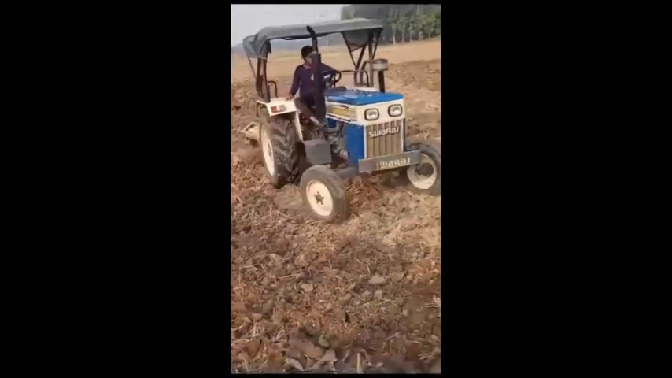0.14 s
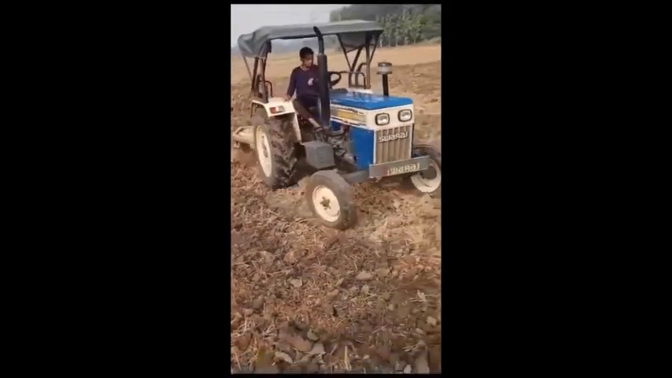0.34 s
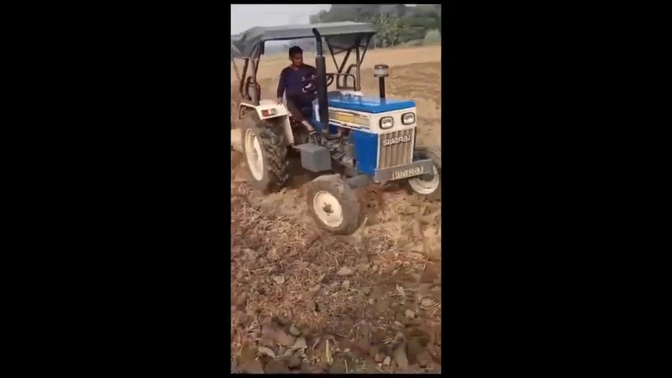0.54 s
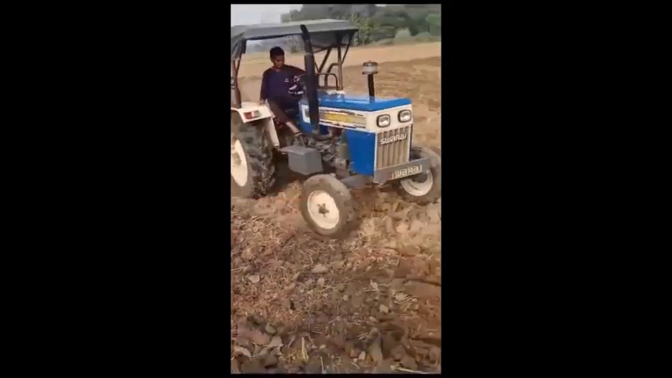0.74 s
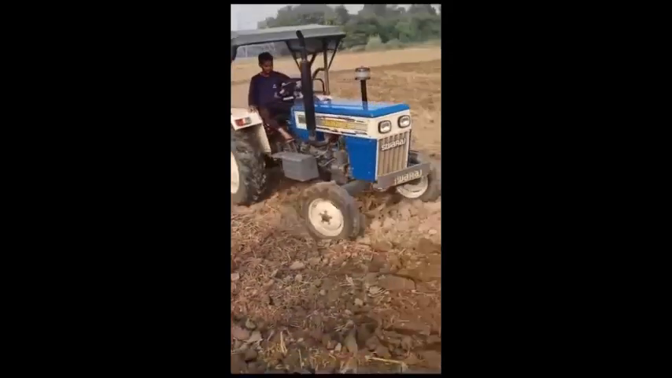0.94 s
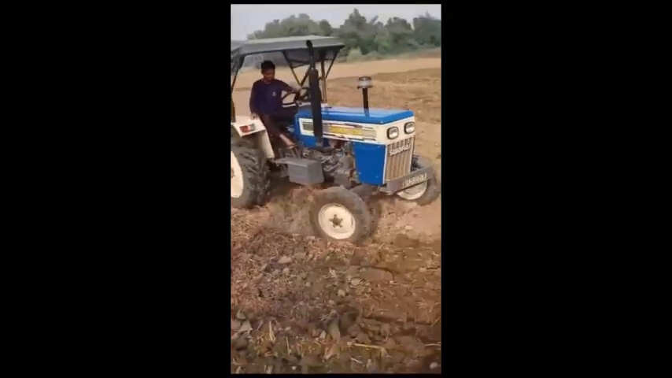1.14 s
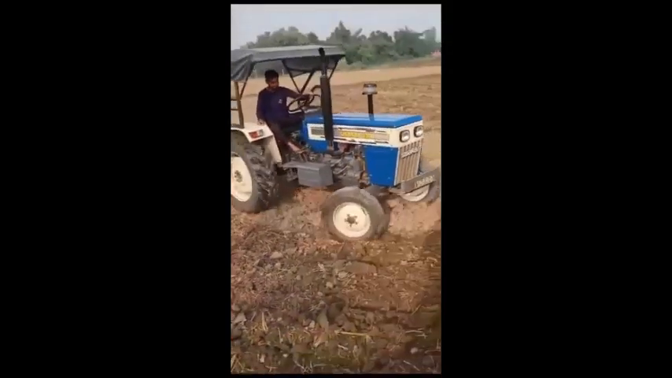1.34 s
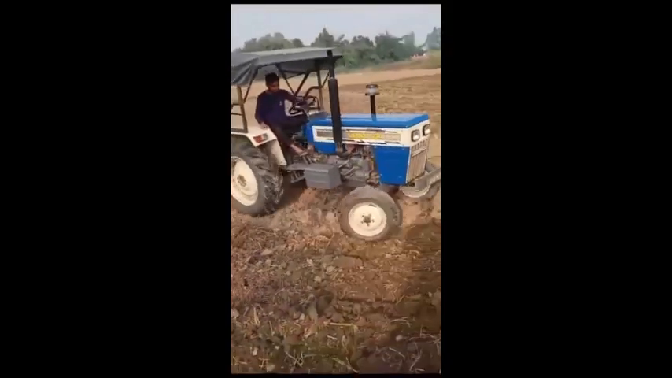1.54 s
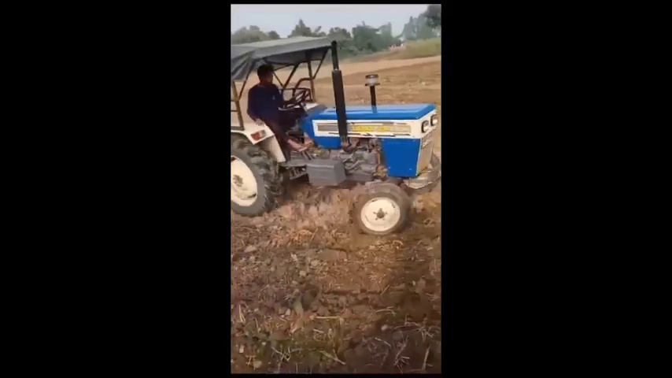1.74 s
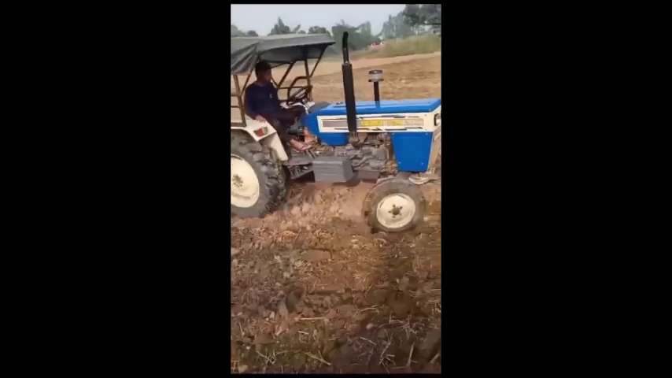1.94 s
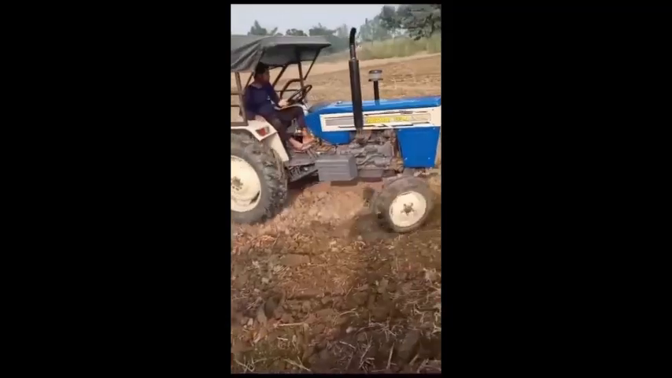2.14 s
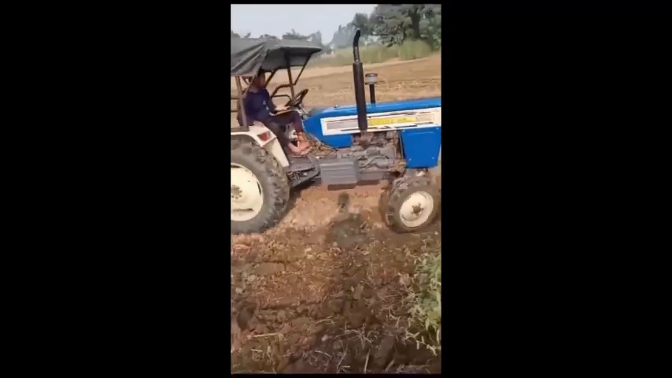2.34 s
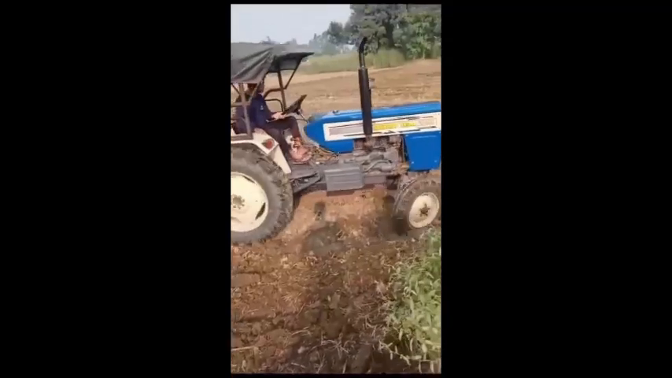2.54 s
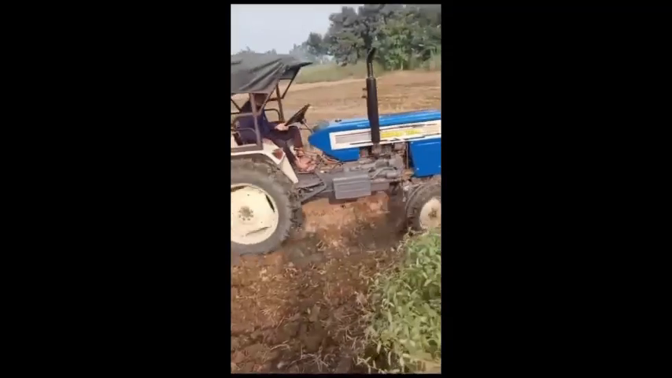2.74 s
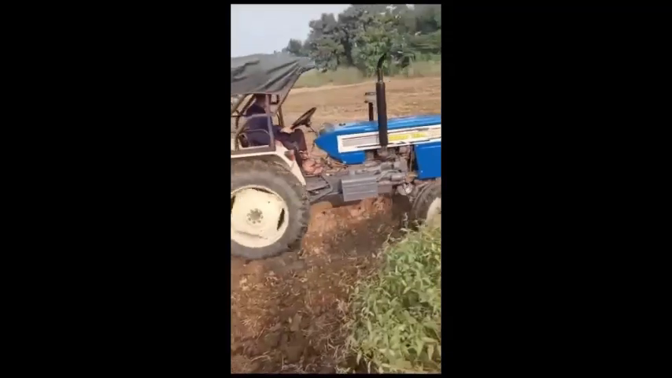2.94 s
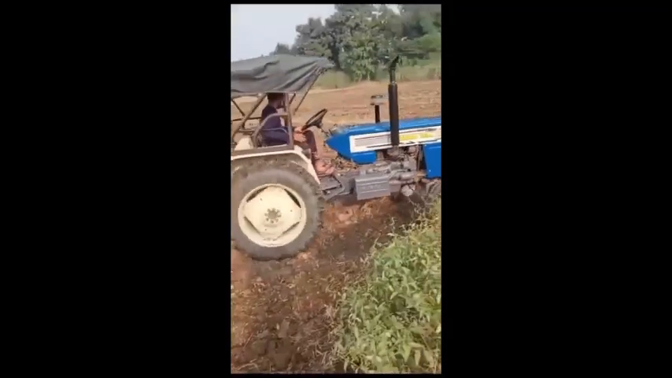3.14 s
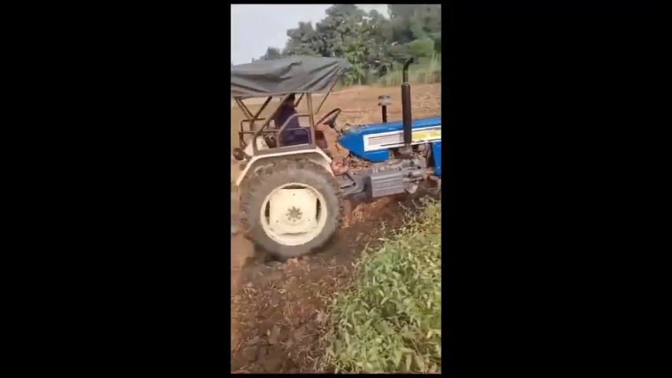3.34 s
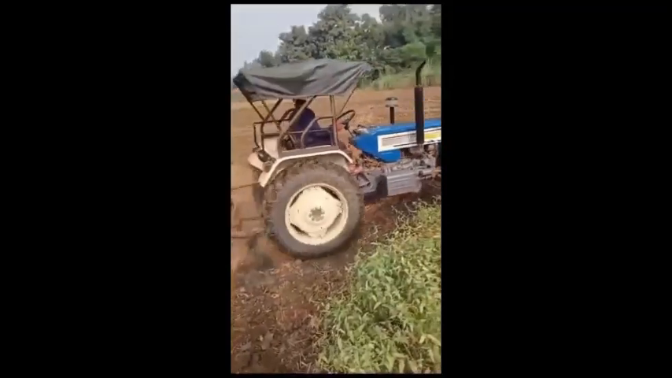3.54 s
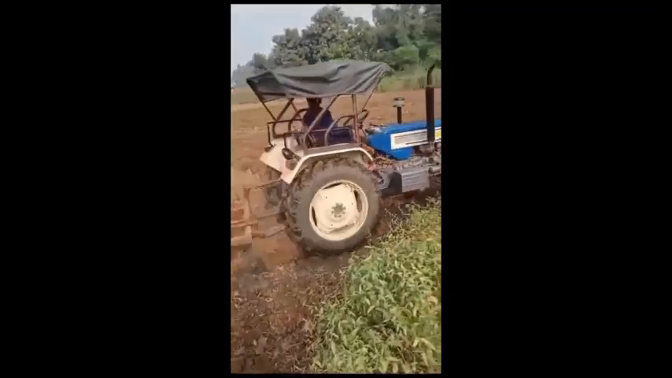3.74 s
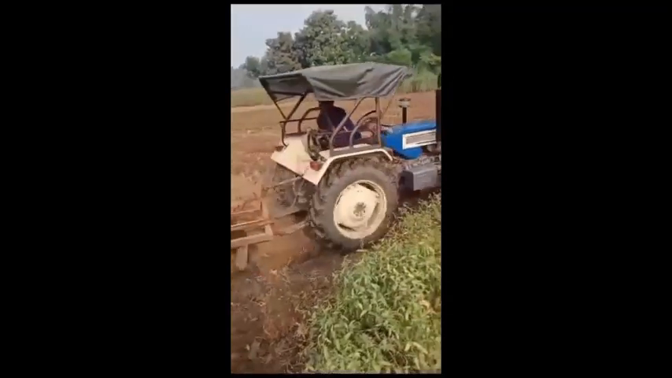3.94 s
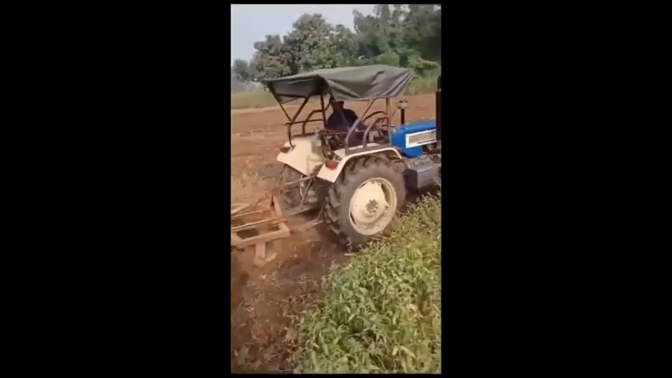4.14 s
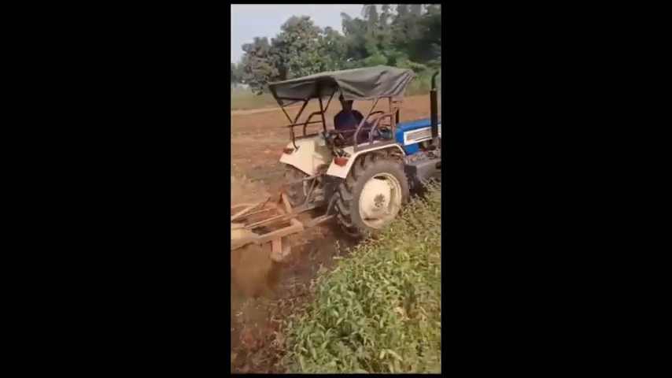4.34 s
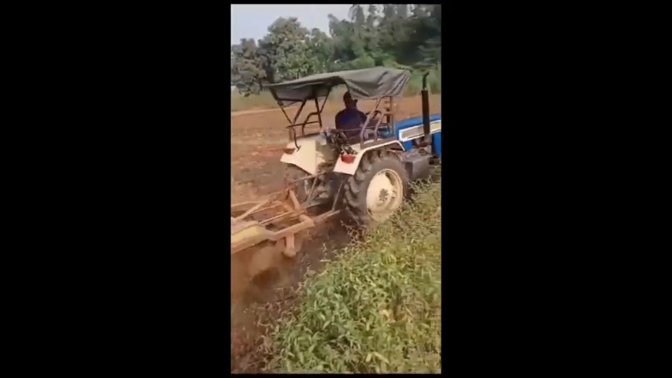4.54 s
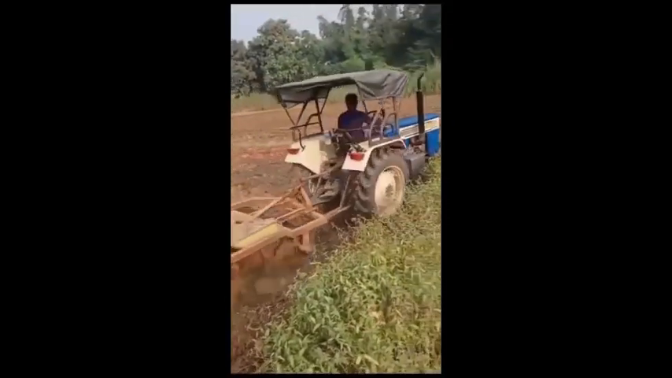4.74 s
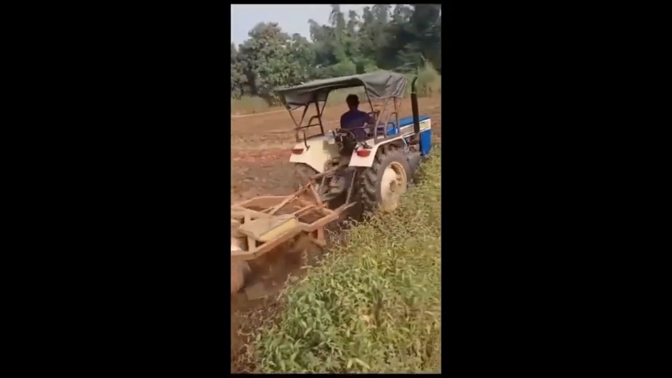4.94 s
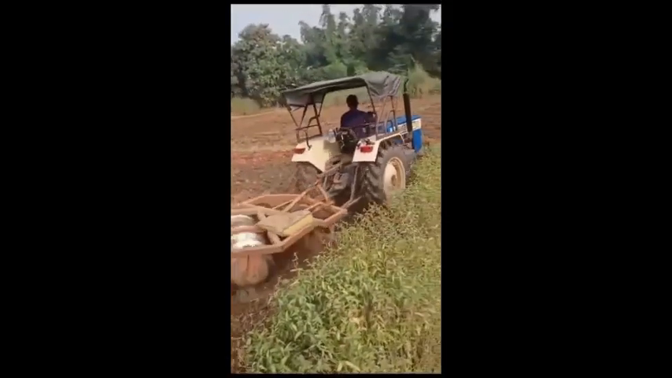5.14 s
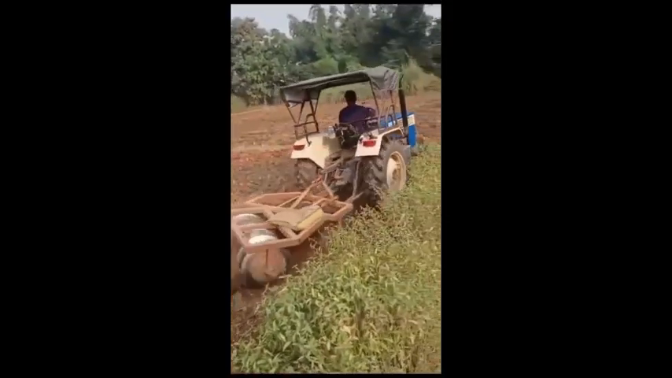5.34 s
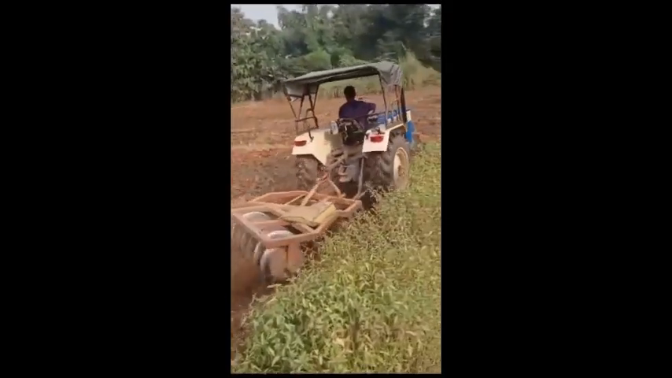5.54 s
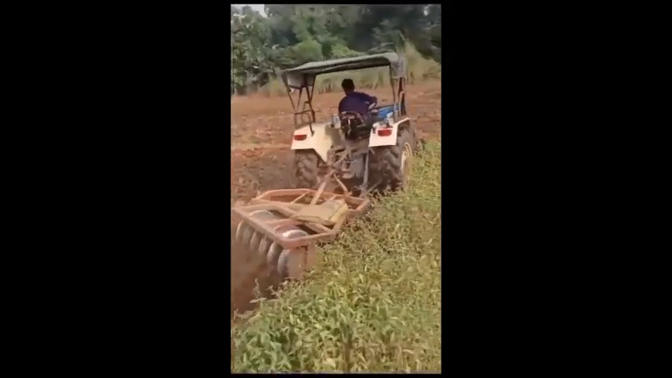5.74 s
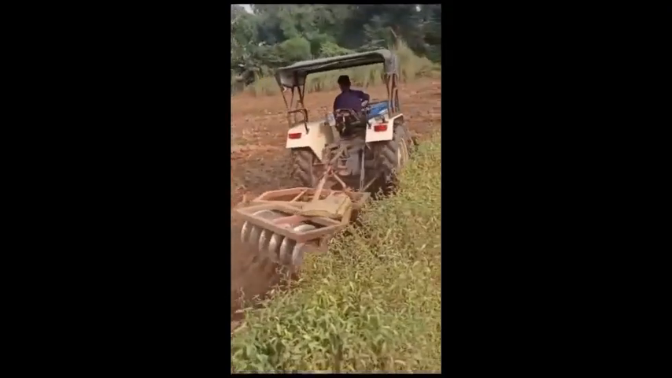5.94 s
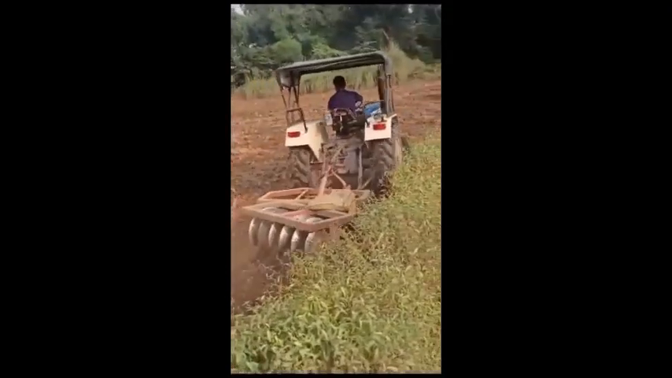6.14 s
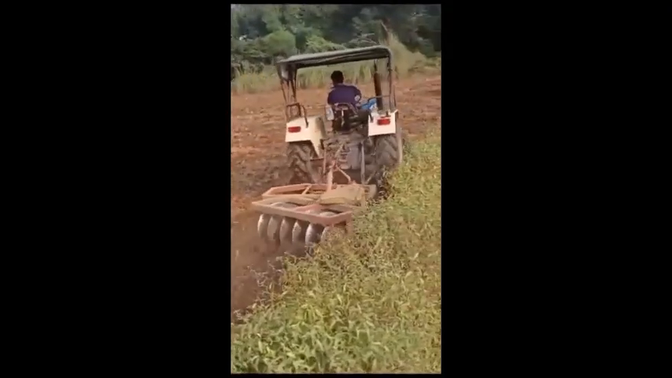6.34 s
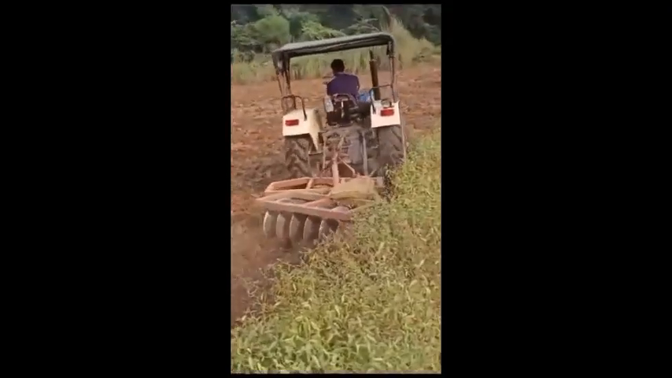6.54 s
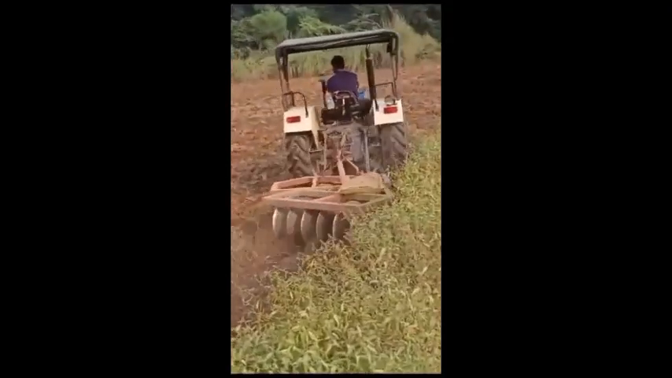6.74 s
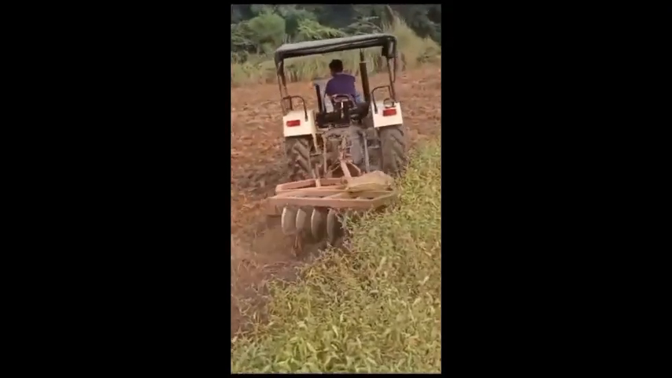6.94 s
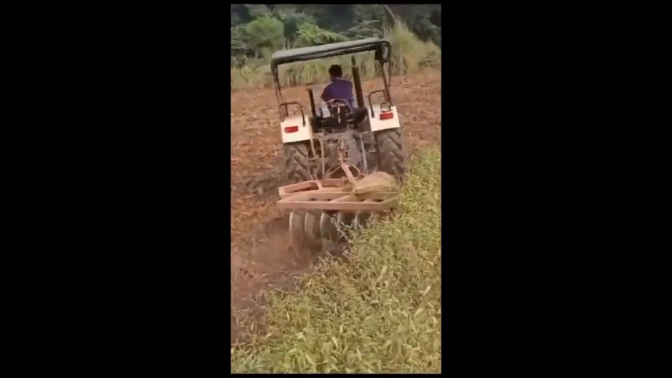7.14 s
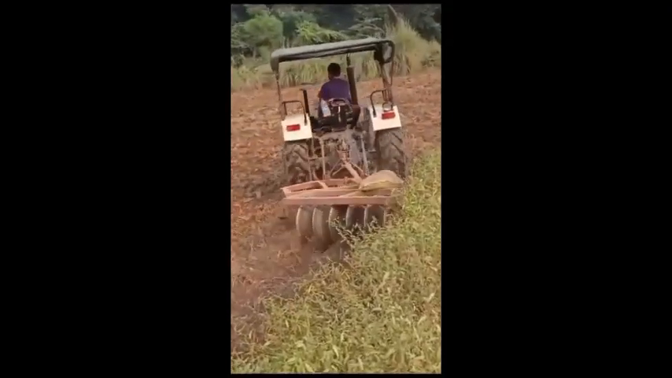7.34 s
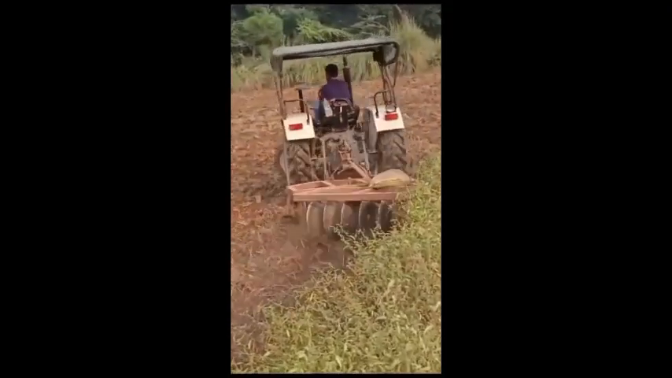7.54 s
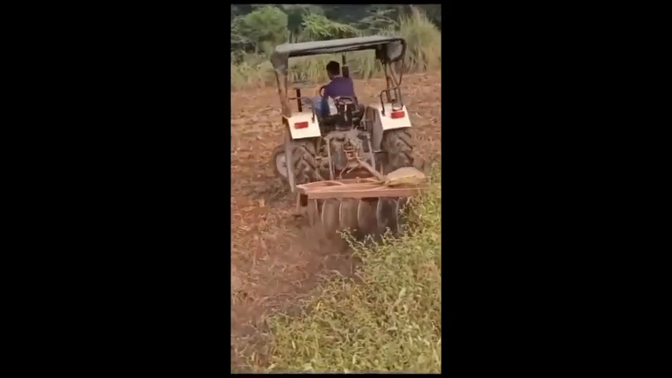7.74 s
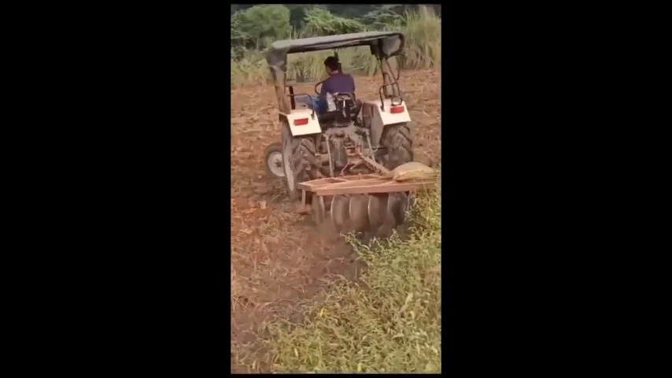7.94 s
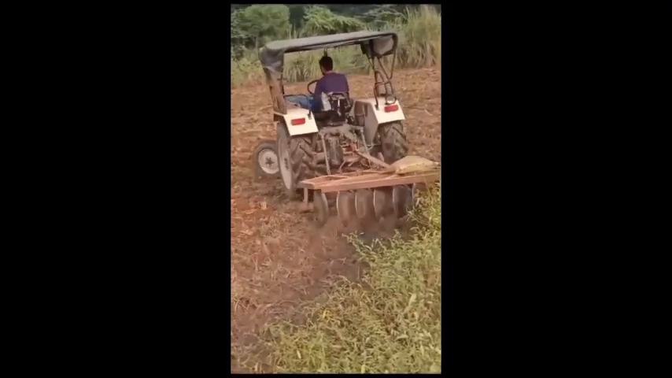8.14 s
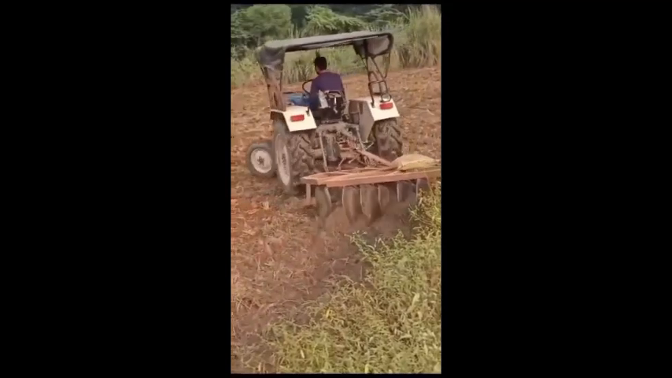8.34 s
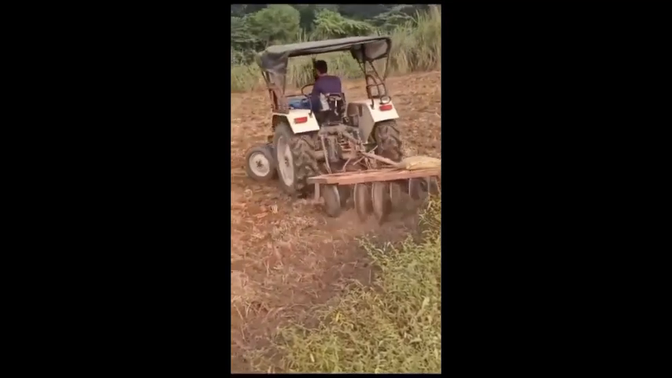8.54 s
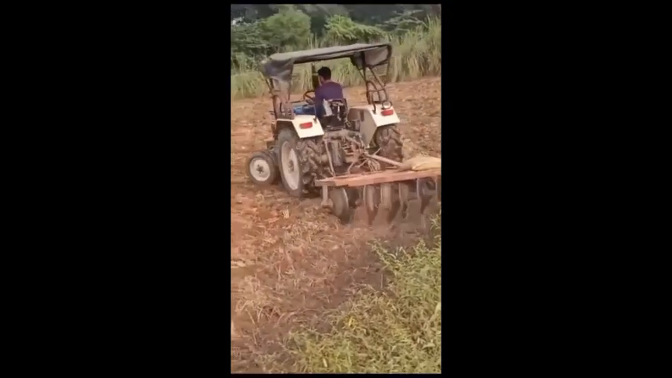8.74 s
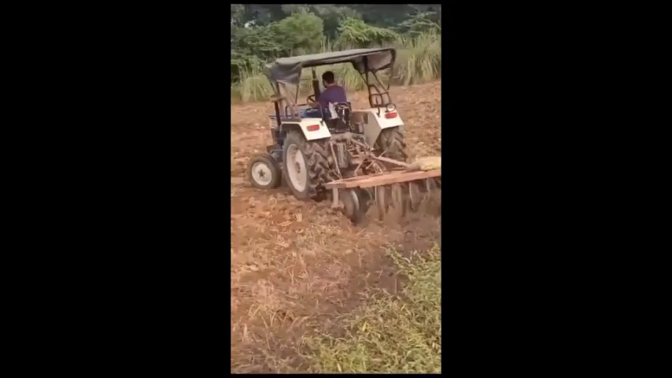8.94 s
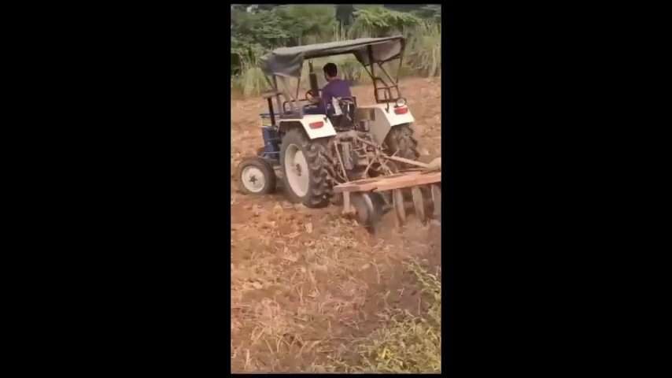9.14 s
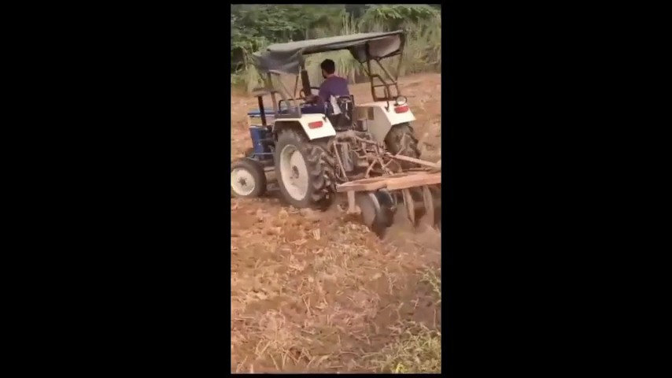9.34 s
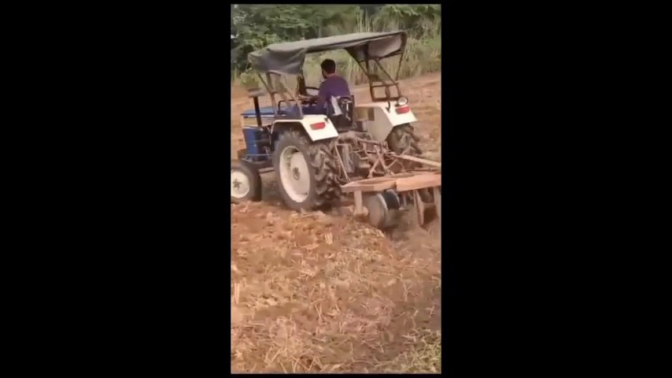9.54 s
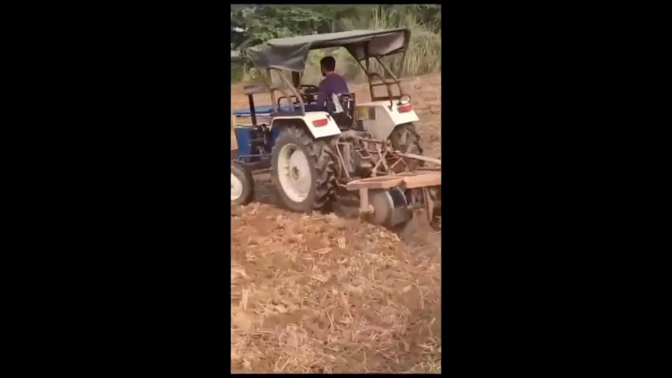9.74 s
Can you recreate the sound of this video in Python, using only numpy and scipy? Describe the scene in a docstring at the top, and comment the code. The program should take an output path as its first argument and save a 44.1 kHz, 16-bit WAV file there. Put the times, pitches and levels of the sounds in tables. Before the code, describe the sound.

Close in an open dry field, a diesel tractor runs at a steady fast chug, bright hard clatter over a low boom. It passes from front to side, then drives off, the clatter softening into a hollow exhaust drone. Around the pass, dry soil crackles and stones clink sharply on harrow discs, followed by faint thin squeaks. Handheld microphone a few metres away, no reverberant space.

```python
"""A diesel tractor booms and clatters past through a dry field, shows its side, then drives away.
Its three cylinders fire in turn; every firing gives a boom, a thud, a puff that rings in three exhaust bands
and a spit of clatter, and one cylinder barks. Harmonics of the firing rate make the boom, filtered impulses
and noise bursts the rest. Behind it a disc harrow crumbles dry soil, as sparse shaped noise, and stones
clink and scrape on the discs, as decaying sines and noise."""
import sys
import numpy as np
from scipy import signal
from scipy.fft import rfft, irfft, next_fast_len
from scipy.io import wavfile
from scipy.ndimage import map_coordinates

SR = 44100
rng = np.random.default_rng(int(sys.argv[2]) if len(sys.argv) > 2 else 0)


def transcribe(u):
    """Save the signal u as a 16-bit wav file named by the first command-line argument.

    u: samples, shape (n,) or (channels, n), limited to [-1, 1]; the rate is SR.
    q: integer samples, one column per channel.
    """
    v = np.clip(np.atleast_2d(u).T, -1, 1)
    q = np.round(v * 32767).astype(np.int16)
    wavfile.write(sys.argv[1], SR, q)


N = 435708

# how the tractor is turned: time_s, bearing (0 front, 0.5 side, 1 rear)
BEARING = [(0, 0.025), (1.7, 0.015), (2.2, 0.18), (2.68, 0.32), (2.95, 0.45), (4.5, 0.75), (6.2, 0.99),
           (9.88, 0.95)]
# spectrum of stone grinding on steel: frequency_hz, relative_density_db
GRIT_SPECTRUM = [(1200, -9), (2600, 9), (5000, -2), (8000, 13), (11500, -7), (13000, -30)]


def amp(db):
    """Logarithmic level: decibels to an amplitude factor."""
    return 10 ** (np.asarray(db) / 20)


def unit(x):
    """Normalization by signal power: scale to rms 1."""
    return x / np.sqrt(np.mean(x ** 2) + 1e-20)


def curves(rows):
    """Linear interpolation in time: one value per sample for each column after the time."""
    time_s, *columns = np.transpose(rows)
    return [np.interp(np.arange(N) / SR, time_s, column) for column in columns]


def noise():
    """White noise: independent Gaussian samples with equal power at all frequencies."""
    return rng.standard_normal(N)


def wobble(rate):
    """Band-limited fluctuation: a smooth random curve through rate knots a second."""
    knots = rng.standard_normal(int(N * rate / SR) + 4)
    return map_coordinates(knots, [np.arange(N) * rate / SR])


def filtered(x, response):
    """Linear filtering: the spectrum of x times a response given as a function of frequency."""
    size = next_fast_len(N + SR // 2)
    return irfft(rfft(x, size) * response(np.fft.rfftfreq(size, 1 / SR)), size)[:N]


def coloured(x, points, size=8192):
    """Minimum-phase filtering: give x a (frequency_hz, level_db) shape causally, at rms 1."""
    hz, db = np.transpose(points)
    bins_hz = np.fft.rfftfreq(size, 1 / SR)
    gain = amp(np.interp(np.log(bins_hz + 1), np.log(hz), db))
    # folding the cepstrum onto positive times makes the filter causal
    cepstrum = irfft(np.log(gain))
    cepstrum[1:size // 2] *= 2
    cepstrum[size // 2 + 1:] = 0
    impulse_response = irfft(np.exp(rfft(cepstrum)))
    return unit(signal.fftconvolve(x, impulse_response)[:N])


def resonated(x, hz, width, db):
    """Cascaded resonance: two equal band-pass stages of the given width in Hz; db sets the rms level."""
    def response(f):
        stage = 1j * f * width / (hz * hz - f * f + 1j * f * width)
        return stage ** 2
    return amp(db) * unit(filtered(x, response))


def turned(views, bearing):
    """Directivity: an equal-power cross-fade through the sounds heard from front to rear."""
    place = np.clip(bearing, 0, 1) * (len(views) - 1)
    return sum(np.sqrt(np.clip(1 - np.abs(place - k), 0, 1)) * view for k, view in enumerate(views))


def heard(facing_db, doubling_loss_db, swell_share):
    """Directivity and distance loss: the level in dB of an engine part, with brief swells and dips."""
    # the tractor comes close, then drives off: time_s, distance_m
    distance = [(0, 4.98), (2, 4.16), (3.2, 3.89), (4.5, 4.8), (7, 7.85), (9.88, 10.85)]
    # the engine briefly swells or dips: time_s, half_length_s, change_db (scaled by swell_share)
    swells = [(0.036, 0.047, 2.5), (0.271, 0.044, -2.5), (0.55, 0.11, 2.5), (2.917, 0.089, -2),
              (3.202, 0.092, 3), (3.726, 0.079, -2.2), (3.966, 0.13, 2.5)]
    reference_m = 4
    t = np.arange(N) / SR
    facing = np.interp(curves(BEARING)[0], np.linspace(0, 1, len(facing_db)), facing_db)
    doublings = np.log2(curves(distance)[0] / reference_m)
    swell = sum(db * np.exp(-.5 * ((t - s) / half_s) ** 2) for s, half_s, db in swells)
    return facing - doubling_loss_db * doublings + swell_share * swell


def firings(crank, cylinders, lead, scatter_db, jitter_s):
    """Pulse-train excitation: an impulse per firing, lead periods early, sized by cylinder and chance."""
    number = np.arange(1, int(crank[-1]))
    chance = rng.standard_normal((len(number), 2))
    at = np.interp(number - lead, crank, np.arange(N)) + jitter_s * SR * chance[:, 0]
    size = amp(np.take(cylinders, number, mode="wrap") + scatter_db * chance[:, 1])
    audible = at > SR // 200  # none in the first 5 ms
    return np.bincount(np.clip(at, 0, N - 1).astype(int), size * audible, N)


def puffs(impulses, rise_s, fall_s, between_db):
    """Flow noise: turbulence flares at each impulse and settles to a steady rush; rms 1."""
    t = np.arange(SR // 20) / SR
    shape = (1 - np.exp(-(t / rise_s) ** 2)) * np.exp(-t / fall_s)
    flare = signal.fftconvolve(impulses, shape / shape.max())[:N]
    return unit(flare * noise() + amp(between_db) * noise())


def field():
    """Broadband ambience: a faint, steady rumble of noise weighted to low frequencies."""
    # rumble spectrum: frequency_hz, relative_density_db
    rumble_spectrum = [(20, -18), (45, -3), (150, -5.5), (400, -16.5), (2000, -33), (15000, -52)]
    return amp(-45) * coloured(noise(), rumble_spectrum)


def soil():
    """Granular fracture: sparse random impulses crackle as dry clods turn, loudest at the closest pass."""
    # crumbling soil: frequency_hz, relative_density_db
    crumble_spectrum = [(1500, -17), (3000, 0), (6000, -5), (8000, 3), (10500, -4), (12500, -10),
                        (15000, 2)]
    pass_s, half_s, crumbs_per_s = 4.9, 0.4, 790
    nearness = 1 / np.hypot(1, (np.arange(N) / SR - pass_s) / half_s)
    struck = rng.random(N) < crumbs_per_s / SR
    crumbs = noise() * struck * amp(2.6 * wobble(40))
    return amp(-38.5) * nearness * coloured(crumbs, crumble_spectrum)


def squeak():
    """Narrow-band resonance: a dry disc axle sings thin and unsteady, setting in fast and fading slowly."""
    # squeaks: time_s, level_db (before the wobble and the resonance level)
    squeaks = [(6.25, -47), (7.15, -49)]
    rise_db_per_s, fade_db_per_s = 64, 14
    t = np.arange(N) / SR
    level = sum(amp(db - np.maximum(rise_db_per_s * (s - t), fade_db_per_s * (t - s))) for s, db in squeaks)
    return level * amp(2.5 * wobble(14)) * resonated(noise(), 3350, 59, -.5)


def disc_ring(t):
    """Modal vibration: a steel disc rings in decaying partials, their strengths varied by chance; rms 1."""
    # disc modes: frequency_hz, level_db, t60_s
    disc_modes = [(5060, -2, 0.071), (6180, 2, .05), (7060, -5, 0.043), (9200, -2, 0.055),
                  (11500, -11, 0.044), (13800, -14, .02)]
    ring = 0
    for hz, db, t60 in disc_modes:
        decay = amp(db + rng.normal(0, 3.6) - 60 * t / t60)
        ring = ring + decay * np.sin(2 * np.pi * hz * t)
    return unit(ring)


def stone_strikes():
    """Impact excitation: each stone ticks, then 3 ms later strikes harder, ringing itself and the disc."""
    # stones on the discs: time_s, peak_db (4.5 dB below the peak used), ring_hz
    stones = [(3.557, -22, 7290), (3.9917, -20, 8010), (4.687, -26, 7290), (4.852, -19, 6850),
              (5.0355, -27, 7980), (5.0868, -23, 7320), (5.3018, -27, 6860), (5.461, -19, 7330),
              (5.694, -28.5, 5000), (5.901, -26, 7850), (6.2218, -26, 4900), (6.545, -32, 7350),
              (6.601, -32, 5920), (6.897, -27, 5840), (8.0845, -37, 8500), (9.2254, -35, 7300),
              (9.5906, -32, 4950)]
    t = np.arange(SR // 8) / SR
    out = np.zeros(N + SR)
    for s, db, hz in stones:
        chip = amp(-60 * t / 0.06) * np.sin(2 * np.pi * hz * t)
        crack = amp(-60 * t / 0.03) * coloured(noise()[:len(t)], GRIT_SPECTRUM)[:len(t)]
        hit = chip + 0.058 * disc_ring(t) + 0.57 * crack
        main_hit = np.pad(hit, (int(.003 * SR), 0))[:len(t)]
        hit = .5 * hit + main_hit
        out[round(s * SR):][:len(t)] += amp(db + 4.5) * hit / np.abs(hit).max()
    return out[:N]


def scrape():
    """Friction excitation: grinding noise from a disc dragged over a stone also drives the disc's modes."""
    # scrapes: time_s, level_db (of the grinding noise), half_length_s
    scrapes = [(7.523, -36.5, 0.014)]
    t = np.arange(SR // 8) / SR
    out = np.zeros(N)
    for s, db, half_s in scrapes:
        drag = np.exp(-.5 * ((np.arange(N) / SR - s) / half_s) ** 2)
        ring = signal.fftconvolve(drag * noise(), disc_ring(t) / np.sqrt(len(t)))[:N]
        out += amp(db) * (drag * coloured(noise(), GRIT_SPECTRUM) + 0.95 * ring)
    return out


def block(crank, bearing):
    """Structure-borne radiation: combustion knock and clatter, blurred with soil hiss from behind."""
    # levels at 4 m before trims: front_db, front_quarter_db, side_db, rear_quarter_db, rear_db
    knock_facing = [-41, -32.4, -42, -38.5, -47]
    clatter_facing = [-24.5, -28.5, -28, -30, -36]
    # strength by cylinder: first_db, second_db, third_db
    cylinders = [1.6, 0, -1.8]
    # spectra of the knock, and of the clatter by side: frequency_hz, relative_density_db
    knock_spectrum = [(250, -43), (500, -1), (800, 1.5), (1050, 1), (1400, 6.5), (1700, -19), (2100, -9),
                      (2600, 2.5), (4000, -29)]
    front_spectrum = [(1500, -31), (2300, 0.5), (2900, 5), (3600, 0), (4300, 1.5), (7800, 0.5), (8900, -5),
                      (10200, -17.5), (12200, -32), (13500, -14), (15000, -10), (15800, -6)]
    side_spectrum = [(1500, -13), (2400, 3), (3500, 2.5), (6500, -0.5), (8100, 4), (9000, -4),
                     (10000, -10.5), (12500, -11.5), (15000, -7), (15800, -21)]
    rear_spectrum = [(1700, -19), (2300, -5.5), (2680, 8.5), (3050, 0.5), (3350, 5), (3750, 0.5),
                     (5200, 1.5), (6700, -2.5), (7400, 3), (8600, 0.5), (9800, -14.5), (12500, -33),
                     (14800, -9), (15800, -15)]
    # a reflection of the engine: time_s, delay_ms
    echo = [(0, 0.68), (1.6, 0.73), (2, 0.83), (2.5, 1.1), (3.1, 1.24), (3.6, 1.23), (5, 1.47), (6.2, 1.47),
            (9.88, 1.6)]

    knock_db = heard(knock_facing, doubling_loss_db=3.5, swell_share=0.59)
    clatter_db = heard(clatter_facing, doubling_loss_db=5.5, swell_share=0.84)
    blows = firings(crank, cylinders, lead=0.081, scatter_db=2.0, jitter_s=0.00042)
    knock = amp(knock_db + 3.0) * coloured(puffs(blows, 0.0028, 0.012, between_db=-9.5), knock_spectrum)
    # injector and valve gear tick just ahead of each combustion
    ticks = firings(crank, cylinders, lead=0.213, scatter_db=4.0, jitter_s=0.0009)
    crumbs = unit(noise() * (rng.random(N) < 900 / SR) * amp(2.8 * noise()))

    spit = puffs(blows, 0.00057, 0.011, between_db=-7)
    spit = spit + amp(-12.0) * puffs(ticks, 0.00028, 0.0028, between_db=-13.0)
    crisp = puffs(blows, 0.00067, 0.0058, between_db=-10.5)
    crisp = crisp + amp(-4) * puffs(ticks, 0.00054, 0.006, between_db=-16.0)
    blur = puffs(blows, 0.0027, 0.0078, between_db=2.0) + amp(-9.5) * crumbs
    front = coloured(spit, front_spectrum)
    side = coloured(crisp + amp(-15) * crumbs, side_spectrum)
    rear = coloured(blur, rear_spectrum)
    clatter = amp(clatter_db - 0.68 + 0.48 * wobble(13)) * turned([front, side, rear], bearing)

    direct = knock + clatter
    # the reflection combs the noise, and its notches slide down as the tractor passes
    delay = curves(echo)[0] * SR / 1000
    return direct + 0.23 * map_coordinates(direct, [np.arange(N) - delay], order=3)


def exhaust_bands(crank, bearing):
    """Band-pass filtering: valve slaps and blows ring in three exhaust bands; the lowest barks early."""
    # strength by cylinder: first_db, second_db, third_db
    bark_cylinders = [0, -7.5, -7.5]
    puff_cylinders = [0.44, 1, -0.6]
    # three ringing bands of the exhaust, shaped by the pipe and by a reflection whose delay changes
    # as the tractor turns; a table for each side shown: frequency_hz, width_hz, level_db
    front_bands = [(699, 166, -3), (1314, 162, -0.5), (1860, 150, 0.5)]
    side_bands = [(747, 121, -2.4), (1470, 410, -0.93), (1928, 180, -2.3)]
    rear_bands = [(687.7, 144, 0), (1369, 164, 0), (1919, 120, 0)]
    # a row per band, levels at 4 m before the drive and band levels:
    # front_db, front_quarter_db, side_db, rear_quarter_db, rear_db
    band_facing = [
        [-32, -28, -23, -25, -19.5],
        [-22.5, -33, -31.5, -32.5, -32],
        [-32, -24.5, -34.3, -31.5, -33.5],
    ]

    early = firings(crank, bark_cylinders, lead=0.2389, scatter_db=1.4, jitter_s=0.00028)
    bark = unit(early) + amp(0.5) * puffs(early, 0.0028, 0.0068, between_db=-9.0)
    blows = firings(crank, puff_cylinders, lead=0.0794, scatter_db=2.04, jitter_s=0.00017)
    puff = unit(blows) + amp(5.5) * puffs(blows, 0.0005, 0.005, between_db=-10.5)

    drives = [bark + amp(-7) * puff, puff, puff]
    levels = [heard(band_facing[0], doubling_loss_db=11.0, swell_share=.8)]
    levels += [heard(facing, doubling_loss_db=6.5, swell_share=1.24) for facing in band_facing[1:]]
    out = np.zeros(N)
    for drive, db, *bands in zip(drives, levels, front_bands, side_bands, rear_bands):
        views = [resonated(drive, *band) for band in bands]
        out += amp(db) * turned(views, bearing)
    return out


def exhaust(crank, bearing):
    """Monopole pulsation: firing-rate harmonics boom at the outlet, with a thud and gas rush per firing."""
    # levels at 4 m: front_db, front_quarter_db, side_db, rear_quarter_db, rear_db
    second_facing = [-20.3, -22.2, -22.3, -19.5, -19]
    third_facing = [-17.7, -20.5, -20, -15.5, -16.5]
    thud_facing = [-17, -21.5, -26.5, -25, -25]  # before the thud and rush mix
    # strength by cylinder: first_db, second_db, third_db
    cylinders = [0, -0.12, 0.29]
    # spectra of the thud, and of the rush by side: frequency_hz, relative_density_db
    thud_spectrum = [(90, -50), (135, -8.5), (175, 4), (210, 5), (245, 1.5), (285, -10), (340, -14),
                     (385, -2), (450, -18), (560, -28.5), (900, -49.5)]
    front_spectrum = [(80, -25.5), (150, 0), (240, -5.5), (290, 1), (380, 1), (470, -3), (580, -11),
                      (1000, -35.5)]
    rear_spectrum = [(80, -16.5), (140, 4.5), (200, -4.5), (280, 1), (350, -3.5), (420, -16), (500, 2),
                     (620, -15), (1000, -34)]

    second_db = heard(second_facing, doubling_loss_db=5.0, swell_share=0.69)
    third_db = heard(third_facing, doubling_loss_db=4.5, swell_share=0.66)
    thud_db = heard(thud_facing, doubling_loss_db=8.0, swell_share=0.71)
    angle = 2 * np.pi * (crank - .035)  # one turn per firing
    boom = amp(second_db) * np.cos(2 * angle) + amp(third_db) * np.cos(3 * angle)
    boom = boom - amp(third_db - 17.5) * np.cos(4 * angle)

    knocks = firings(crank, cylinders, lead=0.1354, scatter_db=0.3, jitter_s=.0001)
    thud = coloured(knocks, thud_spectrum)
    gusts = firings(crank, cylinders, lead=0.361, scatter_db=0.6, jitter_s=0.00059)
    front_rush = coloured(puffs(gusts, 0.0016, 0.01, between_db=-1.0), front_spectrum)
    rear_rush = coloured(puffs(gusts, 0.0013, 0.0093, between_db=-5.5), rear_spectrum)
    front = amp(-2.0) * thud + amp(-6.0) * front_rush
    rear = amp(-9.5) * thud + amp(-1.0) * rear_rush
    return boom + amp(thud_db) * turned([front, rear], bearing ** 1.56)


def scene():
    """Superposition: the field and harrow add to engine sounds that share one crank phase."""
    # the governor hunts around one working speed: time_s, firing_rate_hz
    speed = [(0.0, 35.73), (0.39, 34.46), (1.15, 35.12), (1.8, 34.63), (2.75, 34.58), (3.2, 34.36),
             (4.26, 34.69), (4.79, 34.2), (5.6, 34.59), (6.35, 34.3), (6.7, 34.74), (7.1, 34.26),
             (7.54, 34.51), (7.92, 34.19), (8.25, 34.53), (8.6, 34.4), (9.88, 34.89)]
    crank = np.cumsum(curves(speed)[0]) / SR + 2.302  # phase counted in firings
    bearing = curves(BEARING)[0]
    harrow = soil() + squeak() + stone_strikes() + scrape()
    tractor = block(crank, bearing) + exhaust_bands(crank, bearing) + exhaust(crank, bearing)
    return (field() + harrow + tractor)[None]


def record(dry):
    """Band limitation: an ideal low-pass removes everything from 15750 Hz upward."""
    return filtered(dry[0], lambda hz: hz < 15750)[None]


dry = scene()
out = record(dry)
transcribe(out)
```